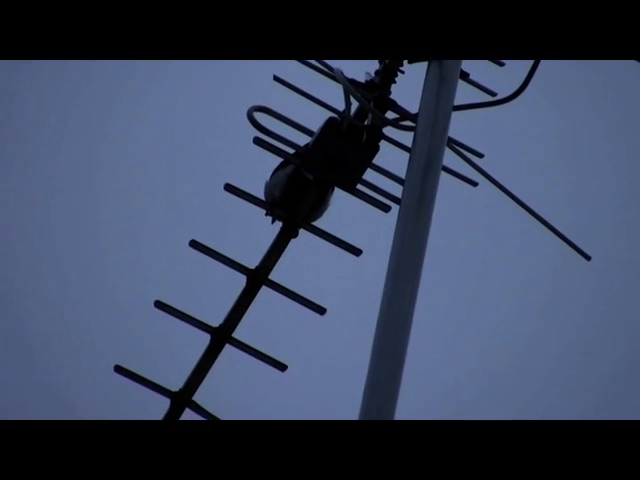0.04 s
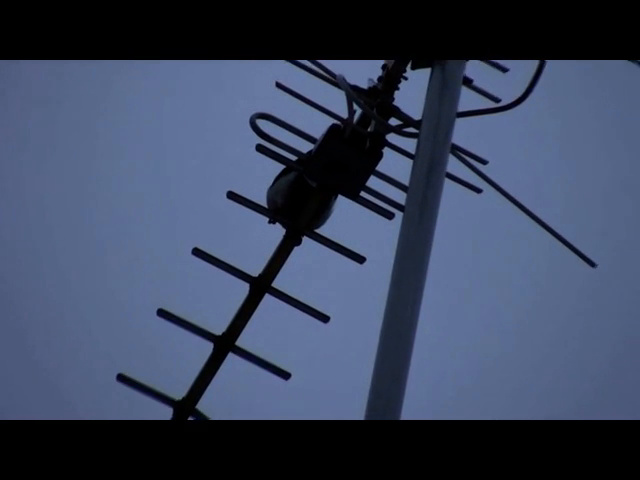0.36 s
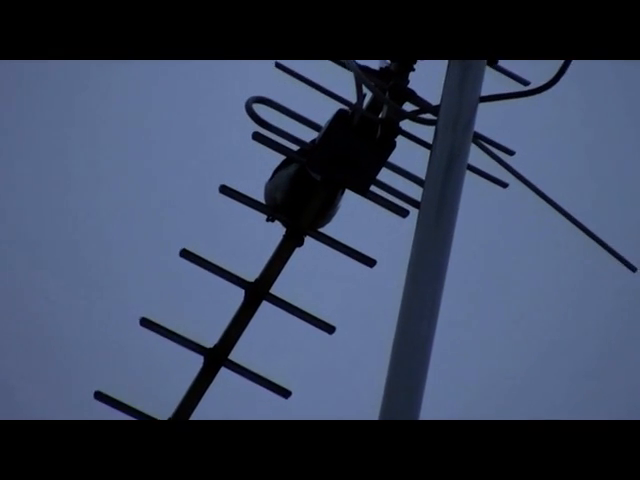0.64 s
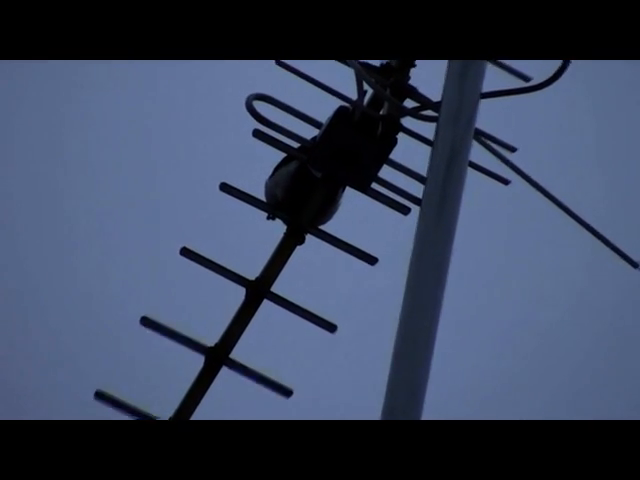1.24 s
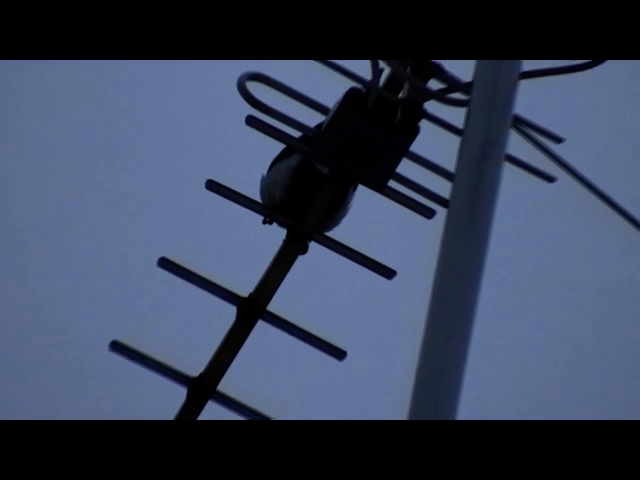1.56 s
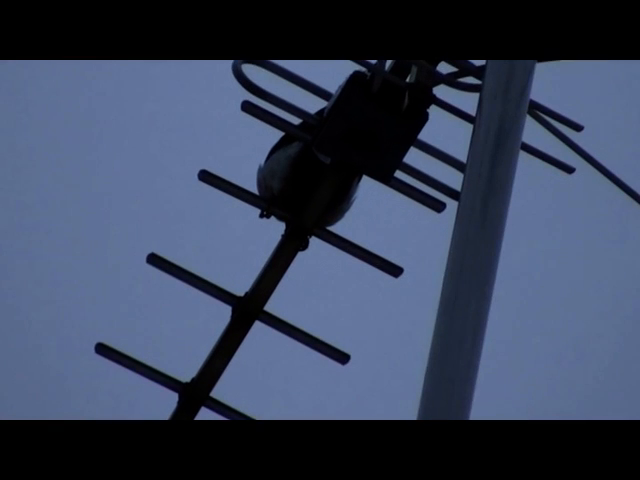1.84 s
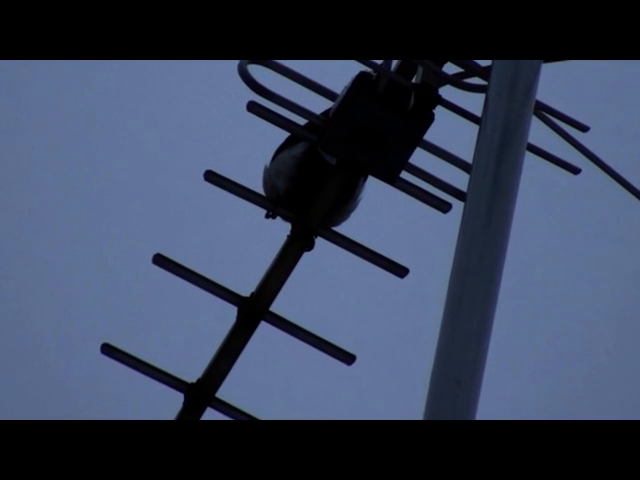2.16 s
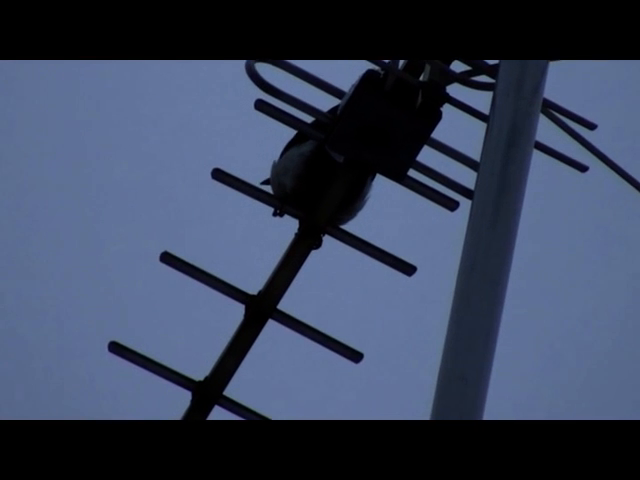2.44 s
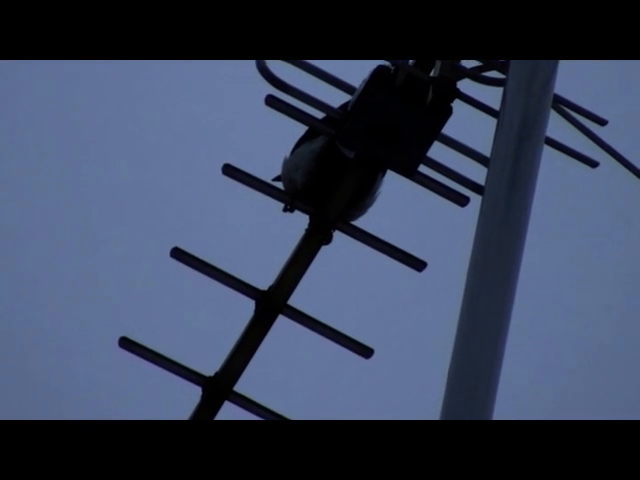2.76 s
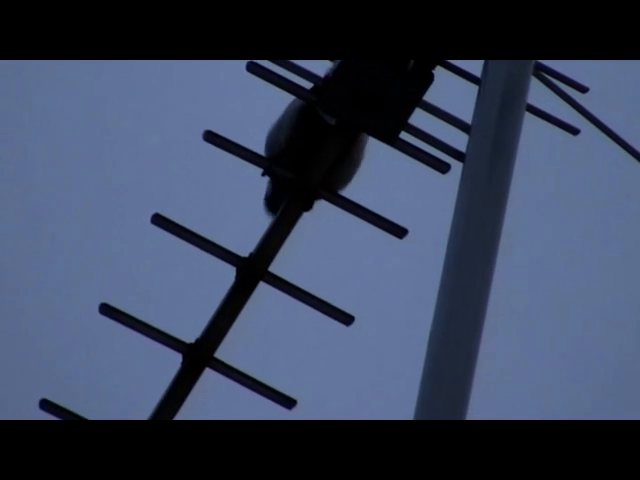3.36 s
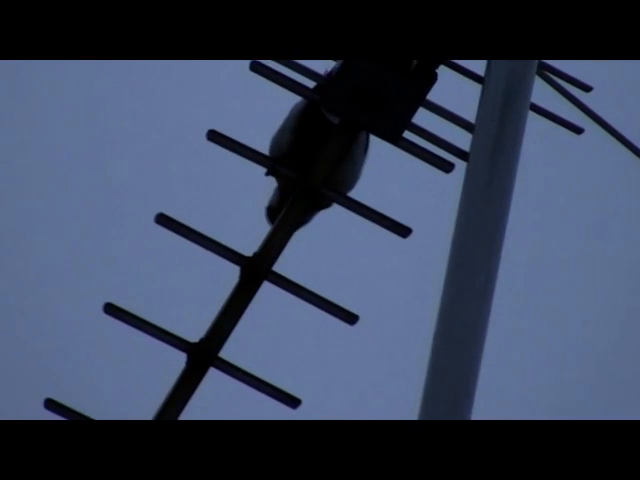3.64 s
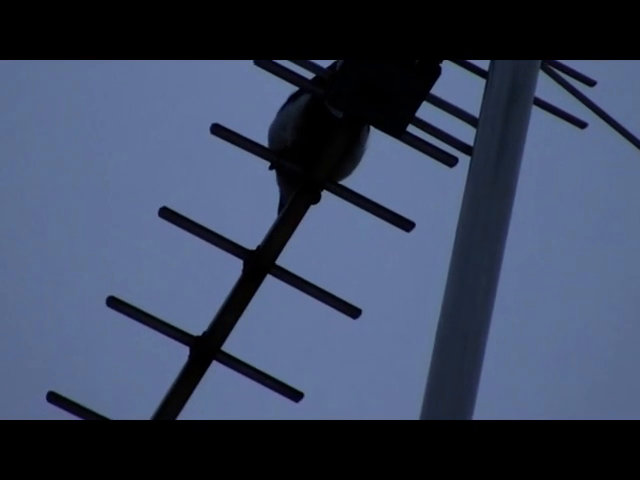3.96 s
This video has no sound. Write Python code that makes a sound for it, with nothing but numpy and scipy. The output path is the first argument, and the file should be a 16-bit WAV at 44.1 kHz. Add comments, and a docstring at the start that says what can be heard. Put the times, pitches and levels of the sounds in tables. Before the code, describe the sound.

A woodpecker drums on a metal rooftop aerial. First come distant traffic, light wind on the microphone, faint birdsong and three thin high calls; then one loud, rapid roll clanks and rings, echoing lightly off nearby roofs.

```python
"""A low rush of distant traffic, with light wind on the microphone and faint birdsong far off.
A small bird gives a few thin high calls. Then, on a rooftop aerial, a woodpecker drums one roll of
ten blows, the loudest sound here: each gives a short clank and sets the rods and the boom ringing.
Loose clamps buzz on, and the roofs and walls around send an echo back to the stereo microphone."""
import sys
import numpy as np
from scipy import signal
from scipy.fft import rfft, irfft
from scipy.io import wavfile

SR = 44100
rng = np.random.default_rng(int(sys.argv[2]) if len(sys.argv) > 2 else 0)


def store_pcm(level_fs):
    """Save levels as 16-bit WAV."""
    pcm = np.round(np.clip(level_fs, -1, 1) * 32767).astype(np.int16)
    wavfile.write(sys.argv[1], SR, np.atleast_2d(pcm).T)


N = 176400
T = np.arange(N) / SR
HZ = np.maximum(np.arange(N // 2 + 1) * SR / N, 1)

# beak blows, quickening and fading: (time [s], level [dB], extra clank, ping and rattle [dB])
BEAK_BLOWS = [(3.35882, -6, -2), (3.40918, 0, 0), (3.45571, .5, 1), (3.50034, -.5, 1), (3.54039, -2, 1.5),
              (3.57952, -2, 2), (3.62002, -4.5, -2), (3.65723, -2.2, -2), (3.69383, -10, -2),
              (3.72844, -11, -1)]
# modes of the aerial; nearly alike rods beat in clusters; the two faint, long rows near 2350 Hz are a lingering
# echo from the walls: (frequency [Hz], level [dB], t60 [s])
AERIAL_MODES = [(130, -34.5, .28), (145, -38, .45), (164, -43, .6), (219, -32, .17), (251, -39, .6),
                (258, -25, .17), (281, -27.3, .45), (288, -34, .45), (379, -39, .2), (473, -34.5, .5),
                (499, -36, .33), (577, -29, .08), (643, -32, .12), (694, -25, .16), (708, -35, .45),
                (729, -32, .24), (875, -35, .13), (990, -38, .1), (911, -33, .15), (946, -23, .15),
                (966, -30, .24), (1159, -35, .24), (1323, -33, .05), (1420, -38, .24), (1470, -26, .05),
                (1602, -25, .03), (2042, -29, .03), (2197, -42, .3), (2351, -25.5, .03), (2347, -51, .65),
                (2372, -55, .75), (2643, -44, .4), (2727, -27, .08), (2788, -38, .24), (2860, -31, .12),
                (2914, -30, .08), (2974, -39, .4), (2984, -23, .22), (3040, -24, .03), (3255, -42, .35),
                (3407, -25, .1), (3478, -31, .03), (3400, -42, .36), (3850, -37, .035), (4170, -38, .05),
                (4310, -40, .05), (4700, -38, .04), (5130, -39, .04), (5470, -38, .05)]
# crowd of short-lived modes at the joints: (frequency [Hz], relative density [dB], t60 [s])
JOINT_CLANK = [(151, -25, 0.08), (407, -9, 0.069), (754, -7, 0.097), (1130, -8, 0.056), (1560, 2, 0.027),
               (1890, 1.5, 0.028), (2300, 7, 0.012), (2540, -15, 0.069), (2800, -3, 0.11),
               (3600, -14, 0.12), (5300, -15, 0.027), (5800, -23, 0.031), (7000, -13, 0.034),
               (8150, -30, 0.041), (10900, -35, 0.037), (16000, -37, 0.032)]
# stereo width of the clank: (frequency [Hz], side against middle [dB])
CLANK_WIDTH = [(200, -25), (2400, -20), (4400, -15), (8000, -10), (15000, 10)]
# bright ping of the beak tip on the tube: (frequency [Hz], level [dB], t60 [s])
BEAK_PING = [(9140, -54, .08), (12560, -41.5, .03), (12580, -50, .03), (13600, -44, .02),
             (13860, -35.5, .03), (13960, -45, .04), (14200, -44, .02)]
# loose clamps buzzing after a blow: (frequency [Hz], relative density [dB], t60 [s])
CLAMP_RATTLE = [(200, -10, 0.17), (600, -2, 0.29), (1500, 3, 0.5), (2490, 0, 0.82), (3100, 2, .16),
                (3700, -7, 0.21), (5000, -14, 0.17), (7300, -8, 0.13), (10000, -21, 0.29),
                (14000, -22, 0.16)]
# echo from roofs and walls: (frequency [Hz], relative density [dB], t60 [s])
YARD_ECHO = [(100, -19, 0.44), (990, 2, 0.14), (2420, -15, 1), (3670, -7.5, 0.61), (7900, 10, 0.27),
             (13000, -10, 0.17)]
# high calls of a small bird:
# (time [s], length [s], mid-note pitch [Hz], glide [Hz/s], hook [Hz], closing drop [Hz], level [dB])
HIGH_CALLS = [(2.524, 0.087, 7230, -5000, 480, 950, -51.5), (2.689, 0.138, 6980, -6500, 800, 600, -52),
              (2.92, 0.088, 6620, -14000, 0, 850, -54.5)]
# birdsong far off, same columns
FAR_SONG = [(-.03, 0.065, 4600, 0, 0, 0, -58), (.075, 0.18, 3830, 600, -750, 0, -62.5),
            (.285, 0.12, 4590, -2000, 330, 0, -63.5), (.495, 0.21, 3440, 0, 0, 0, -64),
            (.59, .09, 3250, -4000, 0, 0, -65), (.63, 0.14, 2620, -4000, -600, 200, -61.5),
            (.945, 0.037, 6100, -7000, 200, 0, -65), (1.095, 0.045, 4320, 0, 0, 0, -63),
            (1.34, 0.07, 4040, 0, 150, 0, -63), (1.42, 0.2, 4180, 800, 0, 0, -68),
            (3.975, .06, 5600, -2000, 0, 0, -61)]
# faint dry ticks: (time [s], centre [Hz], half-width [Hz], level [dB])
DRY_TICKS = [(.44, 4300, 2800, -55), (1.78, 8800, 3000, -54)]
# distant traffic and air, in the middle and at the sides: (frequency [Hz], relative density [dB])
RUSH_MIDDLE = [(25, -27), (64, -18), (104, -18), (140, -6), (200, -4.5), (245, -9), (285, -6), (394, -13),
               (600, -8), (900, -12), (1170, -12), (1600, -22), (2280, -32.5), (3200, -38.5), (6000, -43.5),
               (15000, -50)]
RUSH_SIDE = [(25, -11.5), (64, -11), (99, -15), (180, -11), (400, -14.5), (750, -13), (1200, -17.5),
             (1900, -28), (4000, -34), (16000, -42.5)]
# slow swell of the rush in the middle: (time [s], gain [dB])
RUSH_SWELL = [(0, -1), (.8, -1.5), (1.7, -0.8), (2.7, 1), (3.3, -1.5), (4, -0.5)]
# drone of a far engine: (time [s], level [dB])
ENGINE_LEVEL = [(0, -65), (.55, -43.5), (1.0, -57), (1.3, -43.5), (2.0, -43), (2.8, -47), (3.4, -44),
                (4, -59)]

BLOOM_S, CONTACT_S = .001, .0003   # rise of the ring as the blow spreads along the boom; of the clank
MODE_SCATTER_DB = 1.0   # the beak never lands on quite the same spot
CLANK_DB, RATTLE_DB, TAIL_SAMPLES = -19, -37, 8192
CLANK_CHANGE = .15   # share of the middle clank's power that is new at each blow
TRAVEL_S = .0016   # delay of bending waves at 1 kHz
YARD_DB, YARD_DELAY_S = -17, .02
CALL_ECHO_S, CALL_ECHO_DB, CALL_WET_DB, SONG_WET_DB = .05, -9.5, -14, -3
CALL_HOOK_S, SONG_HOOK_S, HOOK_PEAK_S = .012, .05, .009   # widths of the opening hook; when it turns
DROP_S, WAVER_HZ, FLUTTER_DB = .008, 55, 2.5
TRILL_START_S, TRILL_STEP_S, TRILL_NOTE_S = 1.01, .072, .05
TRILL_HZ, TRILL_GLIDE_HZ_PER_S = 5230, -12000
TRILL_DB, TRILL_FADE_DB = -66, .8   # first note, loss per note
TICK_DECAY_S = .004
RUSH_DB, RUSH_SIDE_DB, ENGINE_HZ, ENGINE_WIDTH_HZ = -38.5, -51, 195, 22.6
WIND_HZ, WIND_WIDTH_HZ, WIND_DB, WIND_LEFT_DB = 65, 21, -55, 2.5
GUST_DB, GUST_HZ = 8, 12   # rms swing and rate of the gusts


def woodpecker():
    """Up on the roof, each blow rings the aerial in a slightly new mix and rattles its clamps afresh."""
    t = T[:SR]
    polarity = (-1) ** np.arange(len(AERIAL_MODES))[:, None]
    modes = polarity * dying_tones(AERIAL_MODES, t) * (1 - np.exp(-t / BLOOM_S))
    ping = dying_tones(BEAK_PING, t[:TAIL_SAMPLES]).sum(axis=0)
    usual_clank = joint_clank()
    side_clank = joint_clank(CLANK_WIDTH) * [[1], [-1]]
    rise = 1 - np.exp(-t[:TAIL_SAMPLES] / CONTACT_S)
    out = np.zeros((2, N + SR))
    for start_s, db, hard_db in BEAK_BLOWS:
        i = int(start_s * SR)
        clank = np.sqrt(1 - CLANK_CHANGE) * usual_clank + np.sqrt(CLANK_CHANGE) * joint_clank()
        rattle = amp(RATTLE_DB) * dying_noise(CLAMP_RATTLE, TAIL_SAMPLES)
        out[:, i:i + SR] += amp(db + rng.normal(0, MODE_SCATTER_DB, len(modes))) @ modes
        out[:, i:i + TAIL_SAMPLES] += amp(db + hard_db) * rise * (clank + side_clank + ping + rattle)
    direct = out[:, :N]
    return direct + amp(YARD_DB) * yard(direct.mean(axis=0))


def joint_clank(tint=None):
    """The joints ring briefly; bending waves bring the highs ahead of the lows."""
    return amp(CLANK_DB) * dying_noise(JOINT_CLANK, TAIL_SAMPLES, TRAVEL_S, tint)


def birds():
    """Three high calls with a wall echo; farther off, song and an uneven trill blurred by distance."""
    trill = [(TRILL_START_S + k * TRILL_STEP_S, TRILL_NOTE_S, TRILL_HZ * rng.normal(1, .0156),
              TRILL_GLIDE_HZ_PER_S, 0, 0, TRILL_DB - TRILL_FADE_DB * k) for k in range(8)]
    calls = whistles(HIGH_CALLS, CALL_HOOK_S)
    song = whistles(FAR_SONG + trill, SONG_HOOK_S)
    wall_echo = amp(CALL_ECHO_DB) * np.interp(T - CALL_ECHO_S, T, calls, left=0)
    return calls + wall_echo + song + yard(amp(CALL_WET_DB) * calls + amp(SONG_WET_DB) * song)


def whistles(notes, hook_s):
    """A bird's note opens with a hook, glides and drops away, wavering a little in pitch and level."""
    waver = WAVER_HZ * noise(hump(0, width_hz=400))
    flutter = amp(FLUTTER_DB * noise(hump(0, width_hz=91)))
    out = np.zeros(N)
    for start, length, hz, glide, hook_hz, drop_hz, db in notes:
        on = (T > start) & (T < start + length)
        t = T[on] - start
        hook = hook_hz * np.exp(-((t - HOOK_PEAK_S) / hook_s) ** 2)
        drop = drop_hz * np.exp((t - length) / DROP_S)
        pitch = hz + glide * (t - length / 2) + hook - drop + waver[on]
        envelope = np.sqrt(np.abs(np.sin(np.pi * t / length)))
        out[on] += amp(db) * envelope * np.sin(2 * np.pi * np.cumsum(pitch) / SR)
    return out * flutter


def yard(x):
    """Roofs and walls return a diffuse echo, different on each side of the microphone."""
    tails = [dying_noise(YARD_ECHO, count=32768) for _ in range(2)]
    late = np.interp(T - YARD_DELAY_S, T, x, left=0)
    return np.array([signal.fftconvolve(late, tail / np.linalg.norm(tail))[:N] for tail in tails])


def ticks():
    """Two faint dry ticks, dead centre, each a brief burst of noise in its own range."""
    return sum(amp(db) * (T >= s) * np.exp(-abs(T - s) / TICK_DECAY_S) * noise(hump(hz, width))
               for s, hz, width, db in DRY_TICKS)


def traffic():
    """Distant traffic: a wide, gently swelling rush in which one engine's drone comes and goes."""
    middle = amp(RUSH_DB + np.interp(T, *np.transpose(RUSH_SWELL))) * noise(amp(at_hz(RUSH_MIDDLE, HZ)))
    side = amp(RUSH_SIDE_DB) * noise(amp(at_hz(RUSH_SIDE, HZ)))
    engine = amp(np.interp(T, *np.transpose(ENGINE_LEVEL))) * noise(hump(ENGINE_HZ, ENGINE_WIDTH_HZ))
    return middle + engine + side * [[1], [-1]]


def wind():
    """Light gusts rumble on the microphone, stronger on the left and in opposite phase on the right."""
    gusts = amp(WIND_DB + GUST_DB * noise(hump(0, GUST_HZ)))
    rumble = gusts * noise(hump(WIND_HZ, WIND_WIDTH_HZ))
    return rumble * [[amp(WIND_LEFT_DB)], [-amp(-WIND_LEFT_DB)]]


def dying_tones(table, t):
    """One decaying sine for each mode, a row apiece."""
    return np.array([amp(db) * np.sin(2 * np.pi * hz * t) * amp(-60 * t / t60) for hz, db, t60 in table])


def dying_noise(table, count, travel_s=0, tint=None):
    """Dense ringing, count samples long: each band has its own level, decay and travel delay."""
    t = np.arange(count) / SR
    hz = np.maximum(np.arange(count // 2 + 1) * SR / count, 1)
    spectrum = np.exp(2j * np.pi * rng.random(len(hz))) * amp(at_hz(table, hz))
    spectrum /= np.std(irfft(spectrum))
    if tint:
        spectrum *= amp(at_hz(tint, hz))
    edges_hz = np.geomspace(90, 17000, 25)
    out = np.zeros(count)
    for low, high in zip(edges_hz, edges_hz[1:]):
        centre = np.sqrt(low * high)
        age = t - travel_s * np.sqrt(1000 / centre)
        band = irfft(spectrum * (hz >= low) * (hz < high))
        out += band * (age >= 0) * amp(-60 * abs(age) / at_hz(table, centre, column=2))
    return out


def noise(gain):
    """Noise shaped by a gain at each frequency, then scaled to rms 1."""
    shaped = irfft(rfft(rng.standard_normal(N)) * gain, N)
    return shaped / np.sqrt(np.mean(shaped ** 2) + 1e-20)


def hump(hz, width_hz):
    """Gain of a resonance, halved at width_hz from its centre."""
    return 1 / (1 + ((HZ - hz) / width_hz) ** 2)


def at_hz(table, hz, column=1):
    """Read a column of a table on a log-frequency axis."""
    table = np.array(table)
    return np.interp(np.log(hz), np.log(table[:, 0]), table[:, column])


def amp(db):
    """Decibels to gain."""
    return 10 ** (np.asarray(db) / 20)


def scene():
    """What reaches the microphone among the roofs: the drum roll, birds, ticks, traffic and wind."""
    return woodpecker() + birds() + ticks() + traffic() + wind()


def record(dry):
    """The recorder cuts the very top."""
    cutoff_hz = 16100
    return signal.sosfilt(signal.ellip(10, .1, 90, cutoff_hz, fs=SR, output="sos"), dry)


dry = scene()
out = record(dry)
store_pcm(out)
```